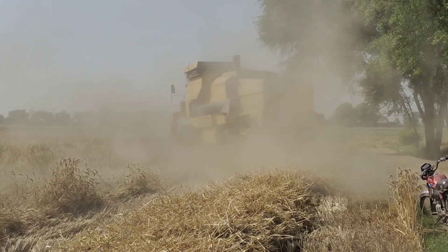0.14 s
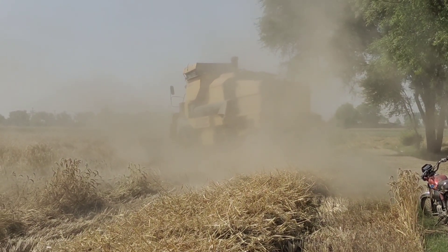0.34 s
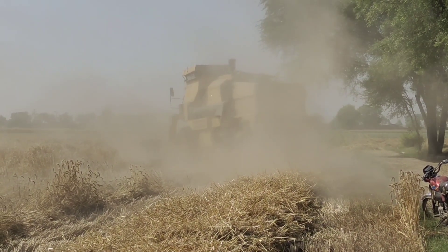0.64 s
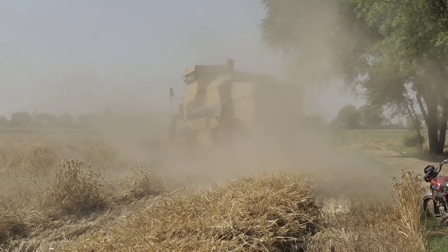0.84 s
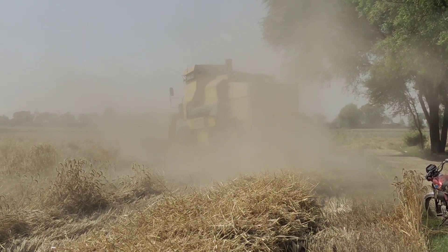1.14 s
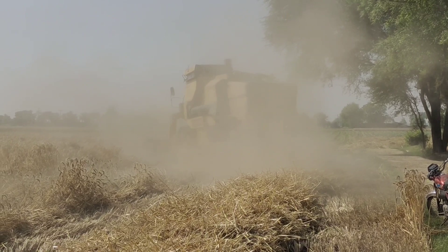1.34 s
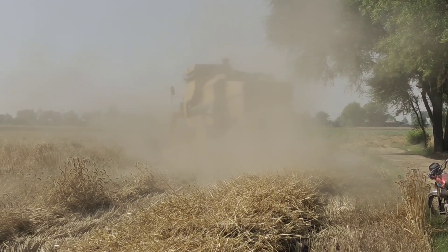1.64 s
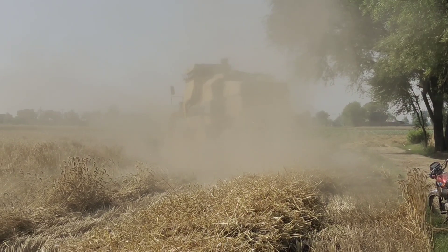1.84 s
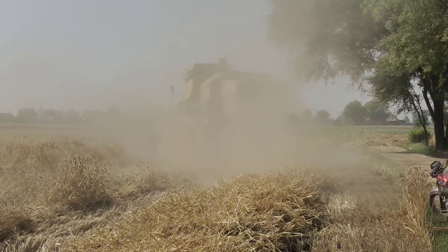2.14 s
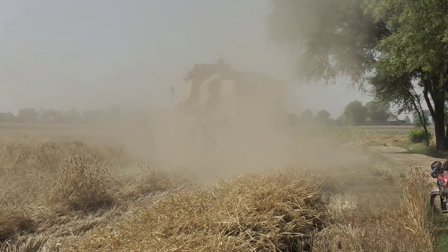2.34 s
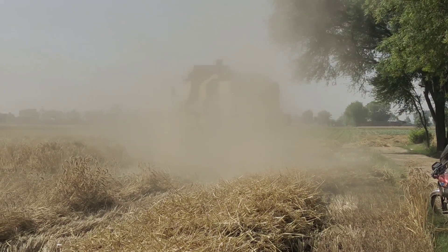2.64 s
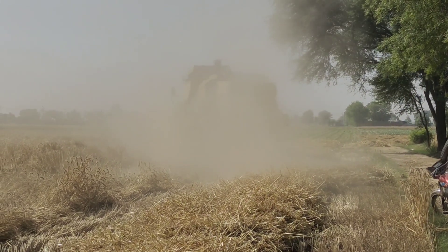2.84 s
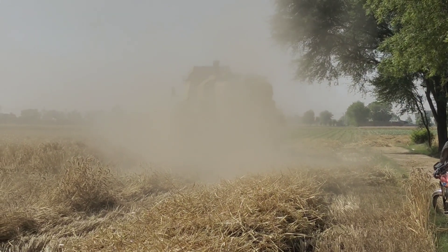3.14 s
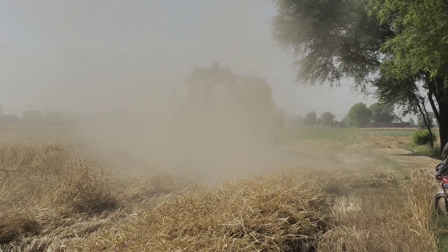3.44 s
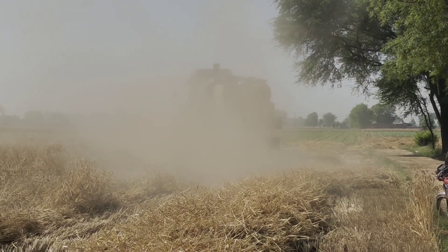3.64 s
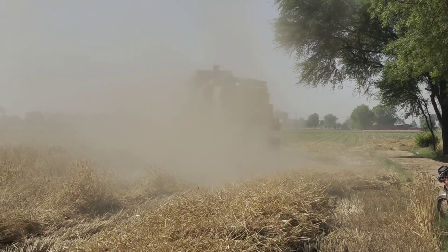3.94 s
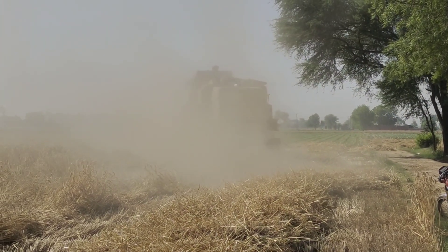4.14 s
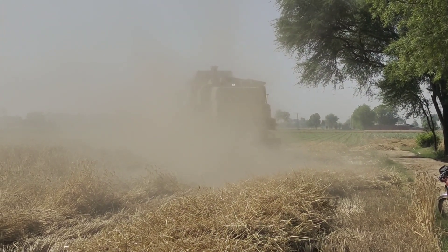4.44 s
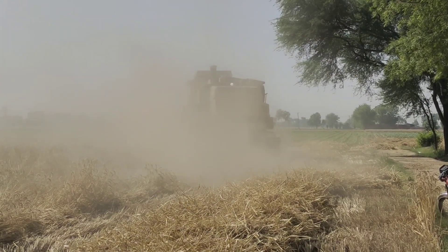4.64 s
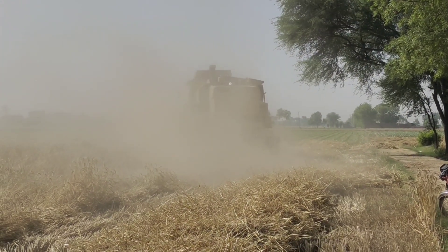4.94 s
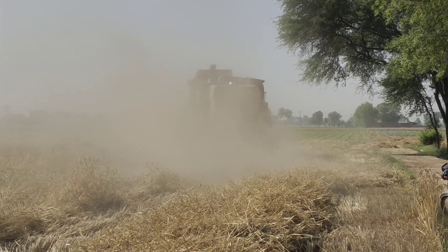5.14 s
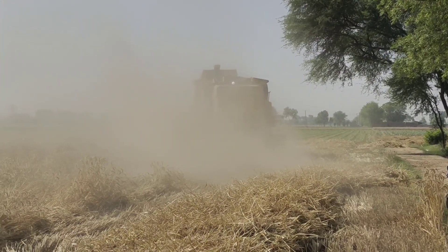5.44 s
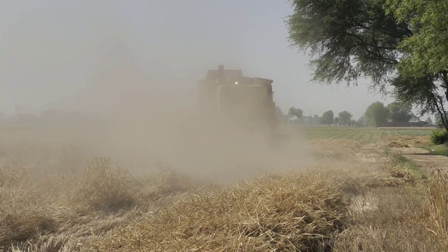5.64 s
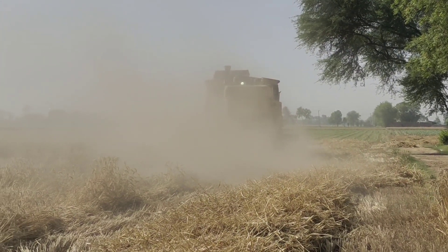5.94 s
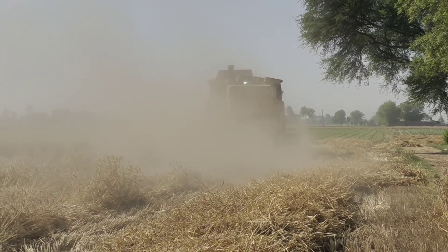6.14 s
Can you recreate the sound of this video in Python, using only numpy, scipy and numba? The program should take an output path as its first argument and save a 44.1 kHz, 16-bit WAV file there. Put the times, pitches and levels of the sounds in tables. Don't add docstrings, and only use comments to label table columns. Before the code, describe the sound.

A combine harvester works outdoors in a dry field, already running at the start and still running at the end, about 6.3 seconds. A thick diesel boom around 106 hertz dominates, swelling and dipping about every 1.6 seconds, with low frame rumble and droning shafts and belts. Uneven cylinder knocks ring the sheet-metal housing and loose panels. A metallic valve clatter near 3.6 kilohertz is prominent from 0.3 to 1.9 seconds, with hard clacks, sinks around 3, then partly returns from 4 seconds. Engine speed lifts very slightly near 3.4 seconds and settles by 5. The threshing drum hums near 141 hertz, pulsing more with crop load after 3.5. Straw roars mid-range; sieves puff airy chaff hiss every 0.18 seconds, with a bigger puff near 1.0. Everything gradually softens by a few decibels as it drives off. Wide treble, brighter left, dry open-air sound.

```python
import sys
import numpy as np
from scipy import signal
from scipy.fft import rfft, irfft
from scipy.io import wavfile
from scipy.ndimage import uniform_filter1d
from numba import njit

SR = 44100
rng = np.random.default_rng(int(sys.argv[2]) if len(sys.argv) > 2 else 0)


def digitize_waveform(pressure):
    field = np.atleast_2d(pressure).T
    bounded = np.clip(field, -1, 1)
    quanta = np.round(bounded * 32767).astype(np.int16)
    wavfile.write(sys.argv[1], SR, quanta)


def makeup_ratio(level_db):
    decades = np.asarray(level_db, float) / 20
    return 10 ** decades


N = 277389
T = np.arange(N) / SR
HZ = np.fft.rfftfreq(N, 1 / SR)


def column(table, count):
    return np.interp(T, np.array(table)[:, 0], np.array(table)[:, count])


def over_hz(table, count):
    return np.interp(np.log(HZ + 1), np.log(np.array(table)[:, 0]), np.array(table)[:, count])


def colour(x, table):
    return irfft(rfft(x) * makeup_ratio(over_hz(table, count=1)) * np.sqrt(SR / 2), N)


def noise():
    return rng.standard_normal((2, N))


def walk(rate):
    hold = int(SR / rate)
    steps = np.repeat(rng.standard_normal(N // hold + 1), hold)
    return 1.76 * uniform_filter1d(uniform_filter1d(steps, hold), hold)[:N]


def tones(turns, lines, wander, patchy_db):
    total = 0
    for multiple, db in lines:
        level = np.sqrt(2) * makeup_ratio(db + patchy_db * walk(2.956))
        phase = 2 * np.pi * multiple * turns + 6 * rng.random() + wander * walk(2.024)
        total = total + level * np.sin(phase)
    return total


@njit
def svf(x, hz, width):
    y, band, low = np.empty(len(x)), 0., 0.
    for i in range(len(x)):
        g, k = np.tan(np.pi * hz[i] / SR), width / hz[i]
        v = (band + g * (x[i] - low)) / (1 + g * (g + k))
        band, low, y[i] = 2 * v - band, low + 2 * g * v, k * v
    return y


def ring(x, hz, width):
    y = np.array([svf(svf(row, hz, width), hz, 2.56 * width) for row in x])
    return y / np.sqrt(np.mean(y ** 2))


# time_s, firing_rate_hz
CRANK_SPEED = [
    (0, 105.65),
    (2.6, 105.65),
    (3.4, 106.15),
    (4.2, 105.95),
    (5, 105.75),
    (6.29, 105.75),
]


def firing():
    return np.cumsum(column(CRANK_SPEED, count=1)) / SR + .16


# time_s, drum_bar_rate_hz, level_db (added to levels, falling as it moves away),
# chaff_flow_db
AWAY = [
    (0.0, 70.95, 1, 0.5),
    (0.9, 70.96, 1.1, -2),
    (1.6, 70.8, 1, 0),
    (2.4, 71, 0.1, 0.5),
    (3.2, 70.69, -0.9, 0),
    (3.8, 70.95, -0.5, 1.5),
    (4.7, 70.66, -0.9, 0.5),
    (5.2, 70.9, -2.3, -0.5),
    (6.0, 70.37, -2.5, 1),
    (6.29, 71, -3, -0.5),
]
BEAT_DIPS_S = [-1.1, .5, 2.13, 3.88, 5.42, 7.0]
# multiple_of_engine_cycle, level_db (rms)
CYCLE_TONES = [(8, -40), (9, -35.5), (11, -51), (12, -45.5), (25, -53.5), (27, -51), (30, -50.5),
               (33, -53.5), (41, -48), (43, -45), (50, -50), (51, -57.5), (63, -57)]
CYLINDERS_DB = [-2.5, -8, -2, -2.5, 3, 2.5]


def exhaust(fired):
    boom_db, twin_db, twin_late_db = -23.6, -31.5, -28.5
    beats = np.interp(T, BEAT_DIPS_S, np.arange(len(BEAT_DIPS_S)))
    twin_level = makeup_ratio(twin_db + (twin_late_db - twin_db) * T / T[-1])
    twin = twin_level * np.sin(2 * np.pi * (fired - beats))
    boom = makeup_ratio(boom_db + 0.67 * column(AWAY, count=2)) * np.sin(2 * np.pi * fired)
    uneven = tones(fired / len(CYLINDERS_DB), CYCLE_TONES, wander=0.32, patchy_db=-0.5)
    return np.sqrt(2) * (twin - boom) + uneven


# frequency_hz, density_db (per Hz)
HOUSING = [(200, -72), (330, -67), (460, -60.5), (650, -64.5), (760, -58.5), (900, -62.5), (1000, -70),
           (1200, -65.5), (1400, -70), (2000, -71.5), (2400, -76), (2700, -79), (4500, -101.5),
           (8000, -125)]


def housing_knocks(knocks, strength_db, chance):
    struck = colour(knocks * makeup_ratio(1.75 * strength_db + 1.4 * chance), HOUSING)
    return struck * makeup_ratio(column(AWAY, count=2) - 12)


def loose_rattle(fired, knocks, strength_db, chance, polarity):
    tail = 1.13 * np.exp(-(fired % 1) / 0.37) * noise()
    struck = 0.36 * knocks * np.sign(polarity) + tail
    return makeup_ratio(0.84 * strength_db + 1.7 * chance) * struck + 0.48 * noise()


# time_s, centre_hz, level_db
CLATTER = [(0, 3740, 3), (.35, 3800, 11), (.8, 3690, 9), (1.3, 3590, 6), (1.8, 3590, 6.5), (2.2, 3600, -4),
           (3.2, 3590, -14), (4, 3700, 0), (4.45, 3600, -1), (4.68, 3560, 3), (5.25, 3480, -7),
           (5.9, 3467, 0), (6.29, 3460, -6)]
# time_s, peak_db
CLACKS = [(0.2728, -21), (0.3296, -17), (0.4998, -23), (0.7267, -17), (0.7831, -19), (1.7499, -22),
          (1.8073, -14), (4.2991, -24), (4.356, -27), (4.6404, -18.5), (4.7536, -27), (5.0734, -27)]


def valve_gear(rattle, knocks, strength_db, chance):
    centre_hz, level_db = column(CLATTER, count=1), column(CLATTER, count=2)
    body = ring(rattle, centre_hz, 410.0) * makeup_ratio(level_db - 53 + 0.85 * walk(20))
    whistle = ring(0.66 * rattle + noise(), centre_hz * (1 + 0.0094 * walk(6)), 140)
    whistle = whistle * makeup_ratio(1.2 * level_db - 61 - 3.5 + 1.2 * walk(7))
    cover_fade_s = .45
    cover = ring(rattle, 3390.0 + 0 * T, 170.0) * makeup_ratio(-47) * np.exp(-(T / cover_fade_s) ** 2)
    loose = strength_db == max(CYLINDERS_DB)
    tappet = [knocks * loose * makeup_ratio(1.02 * level_db + 1.2 * chance)]
    tappet = ring(tappet, centre_hz, 220.0) * makeup_ratio(-63)
    hardest = np.zeros((1, N))
    hardest[0, (np.array(CLACKS)[:, 0] * SR).astype(int)] = makeup_ratio(np.array(CLACKS)[:, 1])
    hardest = ring(hardest, centre_hz, 200.0) * makeup_ratio(-58.5)
    return body + whistle + cover + tappet + hardest


# centre_hz, width_hz, level_db (rms)
PANELS = [(468.5, 53, -47.5), (772, 58, -42.5), (887.5, 42, -48.5), (1147, 115, -51.5), (2360, 170, -51),
          (3427, 78, -63)]


def body_panels(rattle):
    total = 0
    for hz, width, db in PANELS:
        panel = ring(rattle + 0.75 * noise(), hz * (1 + 0.0062 * walk(1.5)), 1. * width)
        total = total + panel * makeup_ratio(db + 1.5 * walk(5))
    return total


def diesel():
    fired = firing()
    stroke = fired.astype(int)
    strength_db = np.array(CYLINDERS_DB)[stroke % len(CYLINDERS_DB)]
    chance = rng.standard_normal((N // 300, 4))[stroke].T
    knocks = np.diff(stroke, prepend=0) * np.sqrt(SR / 105)
    rattle = loose_rattle(fired, knocks, strength_db, chance[1], chance[2])
    housing = housing_knocks(knocks, strength_db, chance[0])
    clatter = valve_gear(rattle, knocks, strength_db, chance[3])
    return exhaust(fired) + housing + clatter + body_panels(rattle)


# multiple_of_bar_rate, level_db (rms)
DRUM_TONES = [(1, -43), (3, -35.5), (4, -41), (5, -52), (8, -48.5)]
# time_s, level_db
SECOND_MULTIPLE = [(0, -28.5), (.7, -25.5), (1.75, -29), (2.5, -27), (3.3, -27.5), (3.7, -33.5), (4.3, -25.5),
                   (4.7, -33.5), (5.15, -25.5), (5.5, -34.5), (5.75, -24), (6.0, -32), (6.29, -25)]


def drum():
    passes = np.cumsum(column(AWAY, count=1)) / SR
    bars = tones(passes, DRUM_TONES, wander=0.23, patchy_db=0.5)
    second_level = np.sqrt(2) * makeup_ratio(column(SECOND_MULTIPLE, count=1) + 0.62 * walk(4.07))
    return bars + second_level * np.sin(4 * np.pi * passes + 1.56)


# pitch_hz, level_db (rms)
SHAFTS = [(5.6, -64), (41.8, -58), (59.5, -70), (118.3, -41), (126.2, -39.5), (131, -42), (150.5, -43.5),
          (164.7, -43.5)]


def shafts():
    return tones(T, SHAFTS, wander=0.77, patchy_db=2.5)


# frequency_hz, density_db (per Hz)
RUMBLE = [(15, -85), (30, -76), (52, -77), (65, -58.5), (85, -55), (110, -49.5), (170, -49), (230, -57),
          (300, -64.5), (600, -95), (1500, -130)]


def straw():
    roar = colour(noise(), HOUSING) * makeup_ratio(column(AWAY, count=2) + 0.62 * walk(5.5))
    return roar + colour(noise(), RUMBLE) * makeup_ratio(1.3 * walk(3.07))


# time_s, peak_db
PUFFS = [
    (0.0827, -42),
    (0.6504, -45),
    (1.0186, -34),
    (1.2469, -38),
    (1.7085, -42),
    (2.8475, -44),
    (3.533, -43),
    (3.7315, -45),
    (4.8534, -43),
]
# frequency_hz, density_db (per Hz)
CHAFF = [(1500, -120), (3000, -80), (4300, -79), (5500, -88.5), (6800, -84.5), (7900, -91.5), (9400, -95),
         (11500, -102), (13500, -104), (14800, -107), (15500, -116)]


def sieves():
    stroke_s, first_stroke_s, puff_s = .1803, .01, 0.0059
    strokes = (T - first_stroke_s) / stroke_s
    nearest = np.round(strokes).astype(int)
    strength_db = -12 + 1.5 * rng.standard_normal(nearest[-1] + 1)[nearest]
    puffs = makeup_ratio(strength_db) * np.exp(-np.abs(strokes - nearest) * stroke_s / puff_s)
    for start_s, peak_db in PUFFS:
        puffs = puffs + makeup_ratio(peak_db + 29) * np.exp(-np.abs(T - start_s - .008) / puff_s)
    grains = makeup_ratio(1.6 * rng.exponential(size=N))
    hiss = noise() * grains / np.sqrt(np.mean(grains ** 2))
    flow_db = 1 + column(AWAY, count=2) + column(AWAY, count=3) + 0.34 * walk(15)
    return colour(hiss * (0.65 + puffs) * makeup_ratio(flow_db), CHAFF)


def scene():
    return diesel() + drum() + shafts() + straw() + sieves()


def band_limit(x):
    return signal.sosfilt(signal.butter(12, 15380, fs=SR, output="sos"), x)


# frequency_hz, level_db, common_share (0-1), lead_rad
PORTS = [(35, 0, .8, 0), (90, .3, .985, 0), (330, 1, .93, .15), (800, .4, .99, .1), (1450, 1, .88, 0),
         (1800, -2, .74, .9), (2500, 6.5, .74, .7), (3650, 16, .8, -.3), (4300, 5, .45, -1.5),
         (6100, 0, .12, -1), (8500, 15, .18, 0), (10500, 11, .1, -1.5), (13000, 15, .05, 0),
         (15000, 14, .05, 0)]


def record(dry):
    shared, scattered = rfft(dry)
    common = np.clip(over_hz(PORTS, count=2), 0, 1)
    left = shared * makeup_ratio(over_hz(PORTS, count=1)) * np.exp(1j * over_hz(PORTS, count=3))
    right = common * shared + 1j * np.sqrt(1 - common ** 2) * scattered
    return band_limit(irfft(np.array([left, right]), N))


dry = scene()
out = record(dry)
digitize_waveform(out)
```